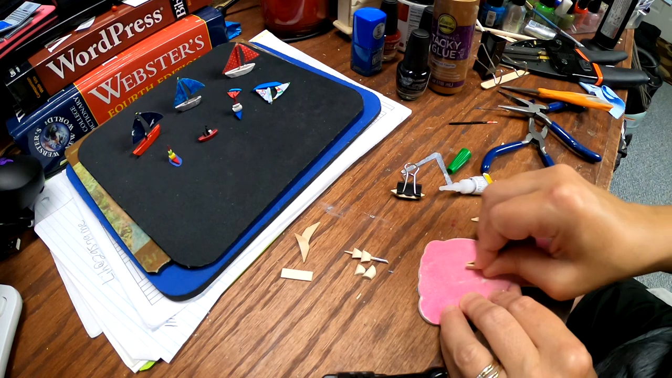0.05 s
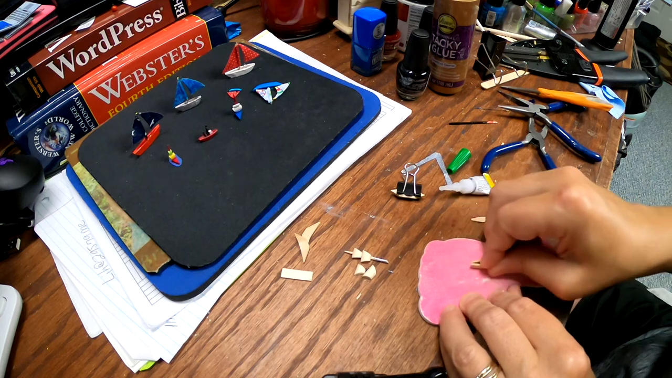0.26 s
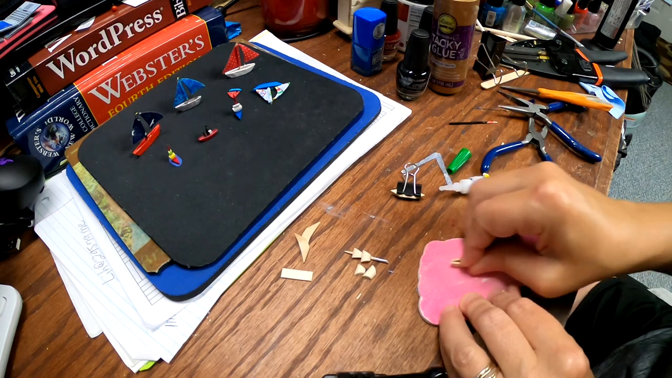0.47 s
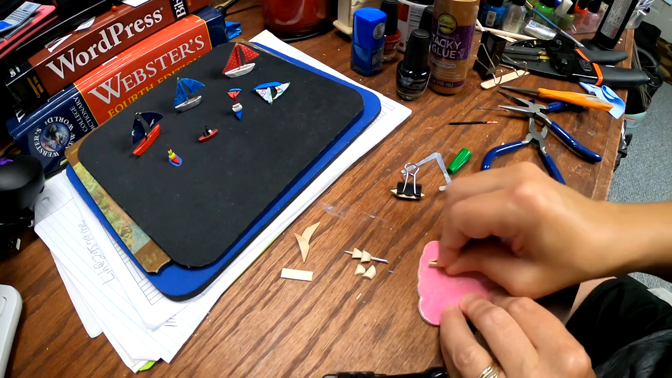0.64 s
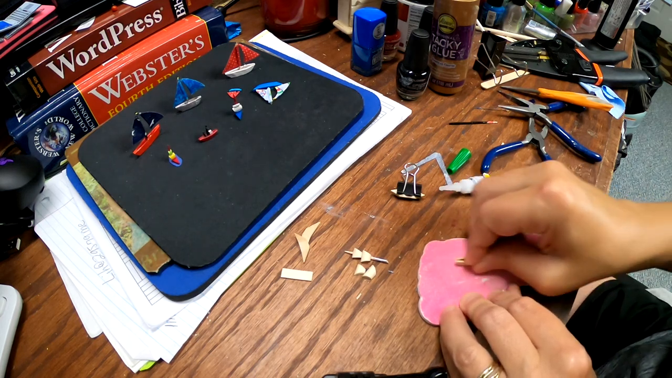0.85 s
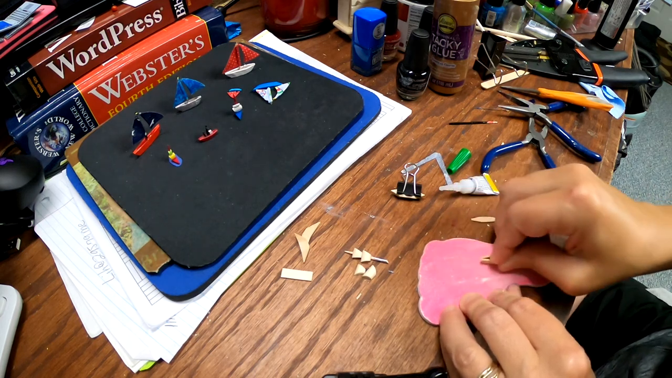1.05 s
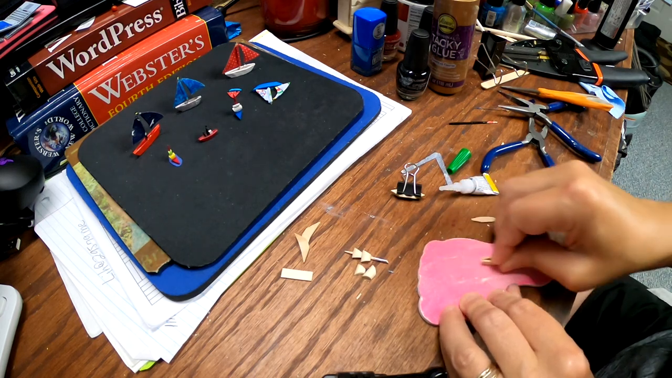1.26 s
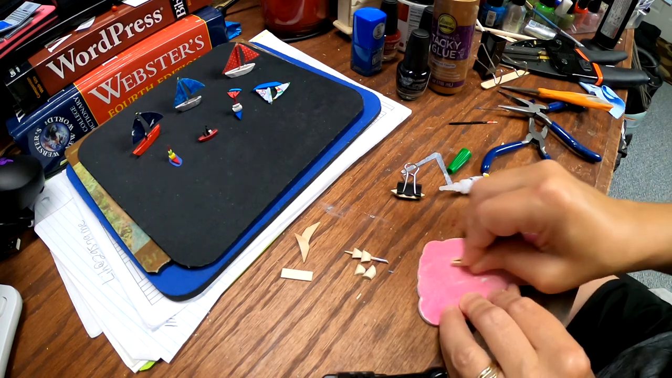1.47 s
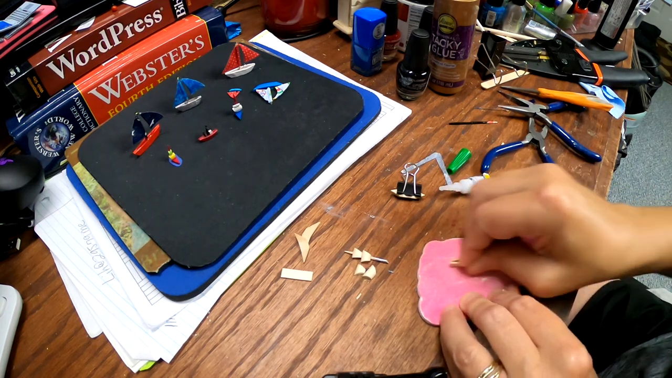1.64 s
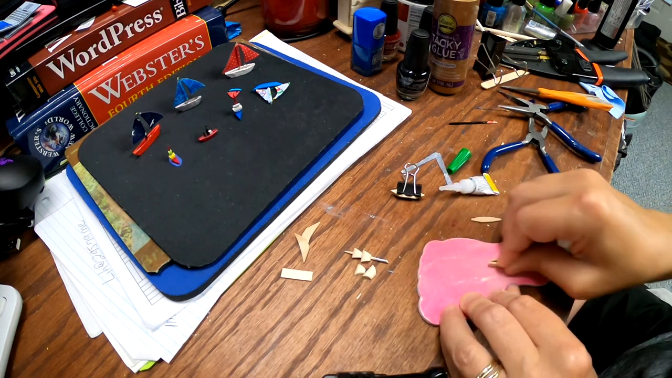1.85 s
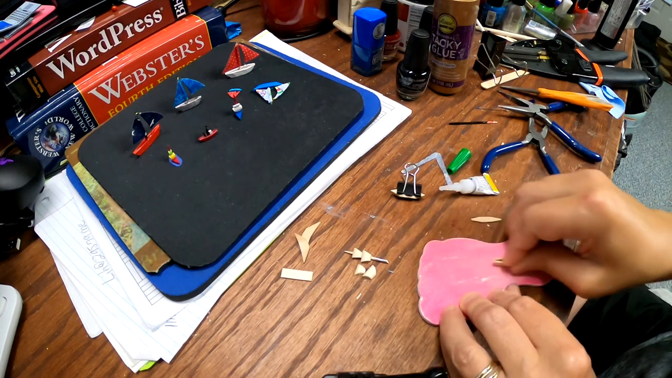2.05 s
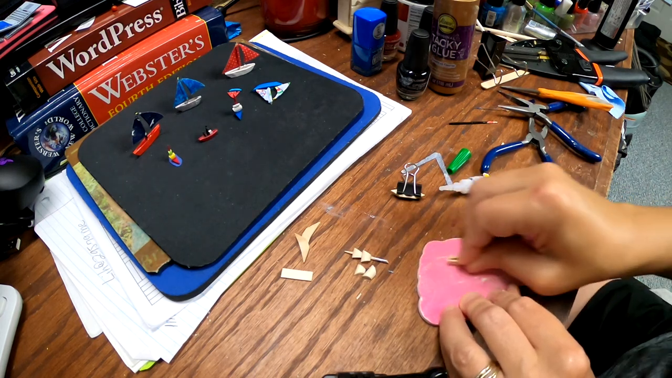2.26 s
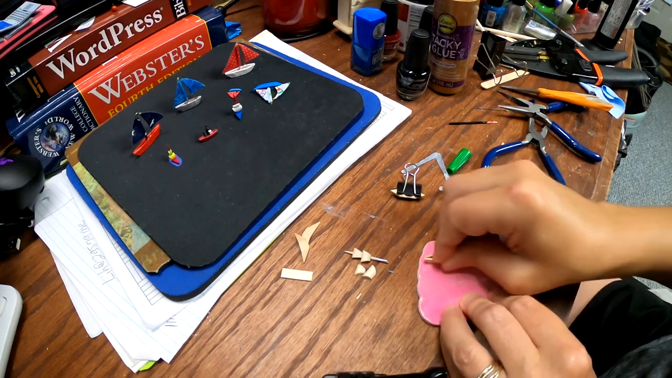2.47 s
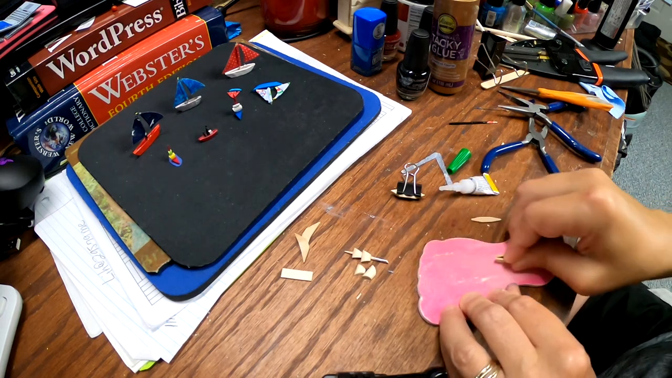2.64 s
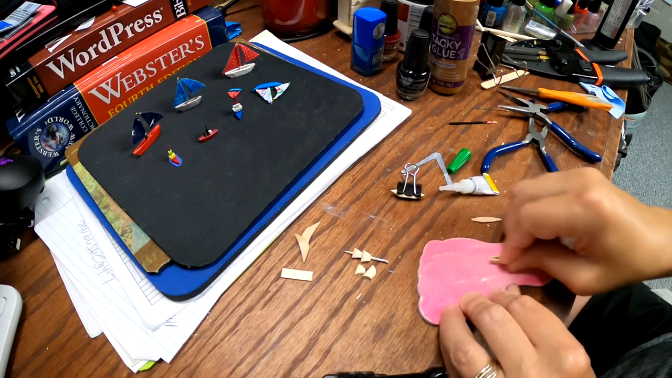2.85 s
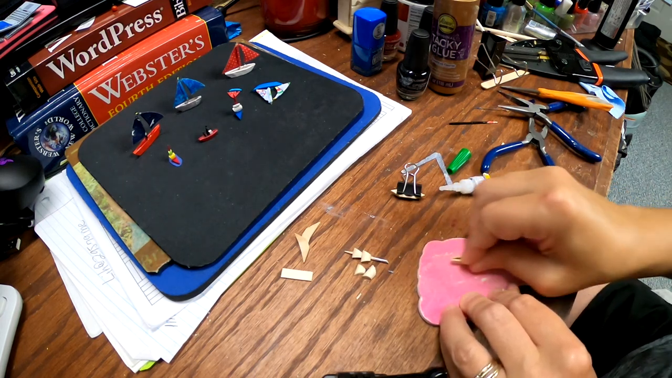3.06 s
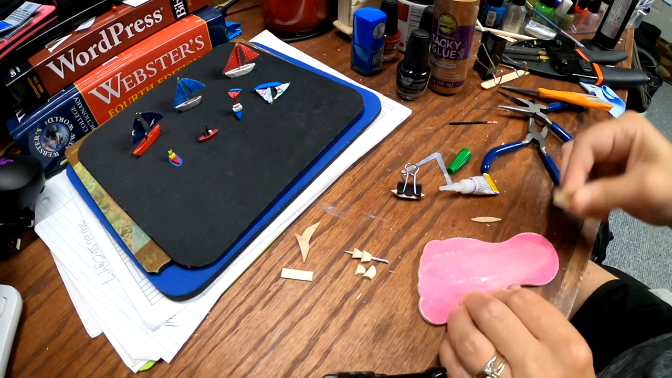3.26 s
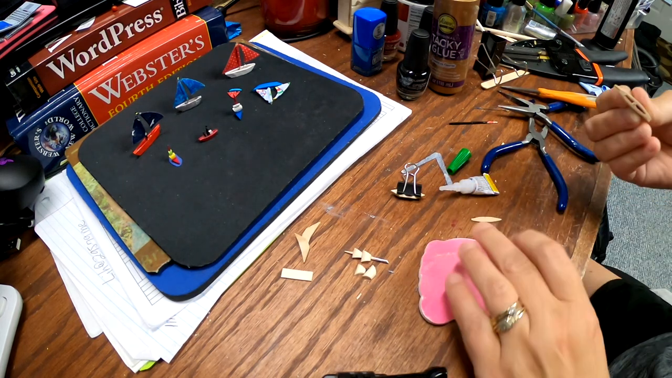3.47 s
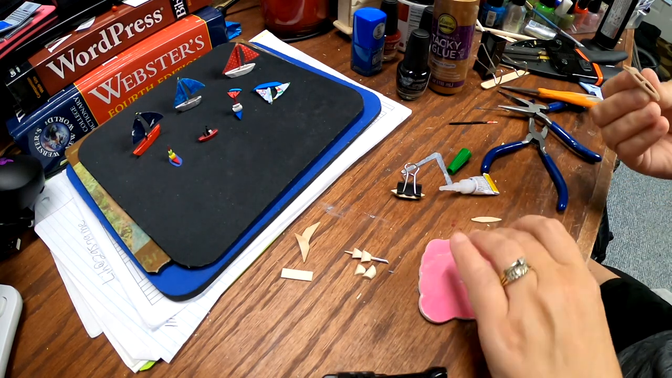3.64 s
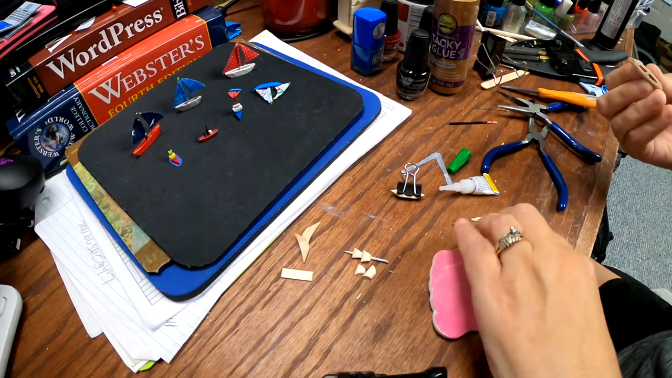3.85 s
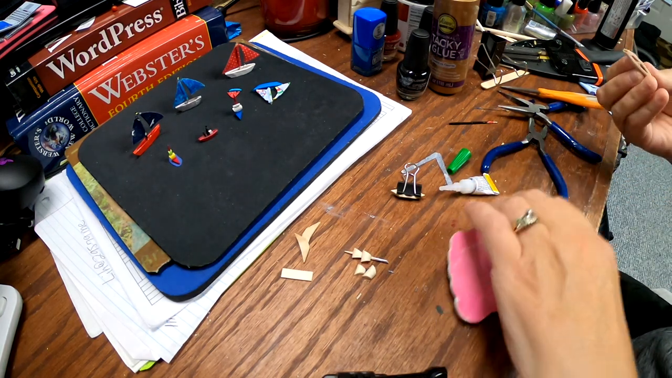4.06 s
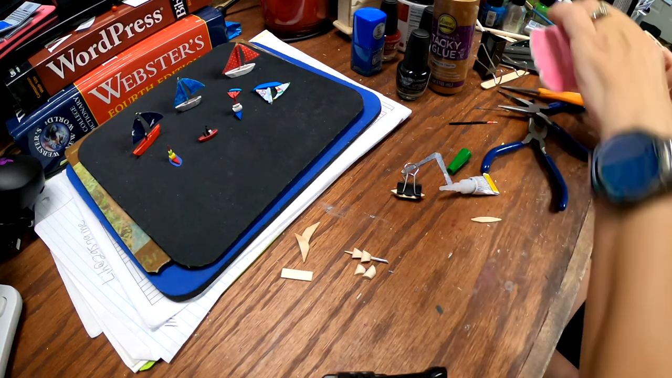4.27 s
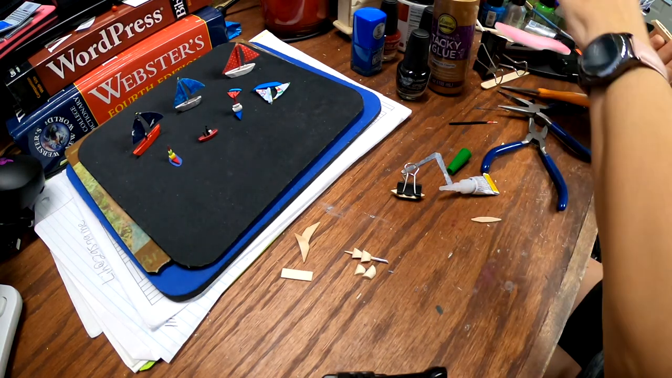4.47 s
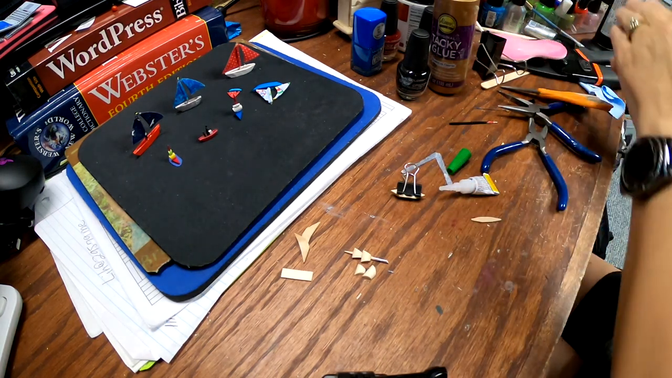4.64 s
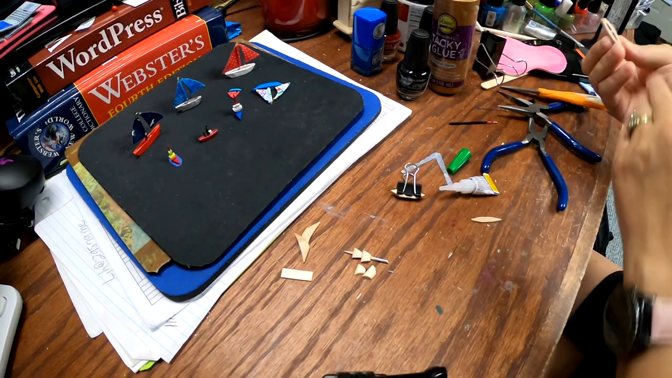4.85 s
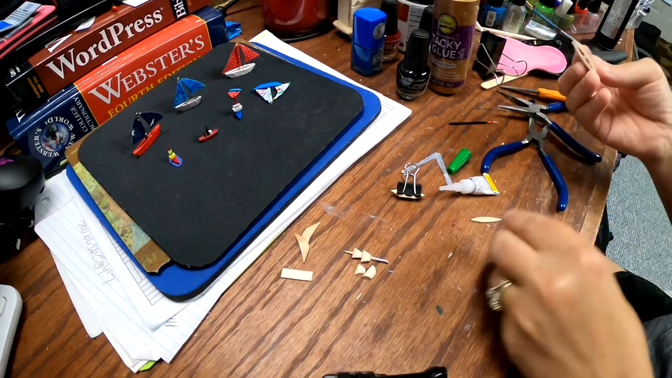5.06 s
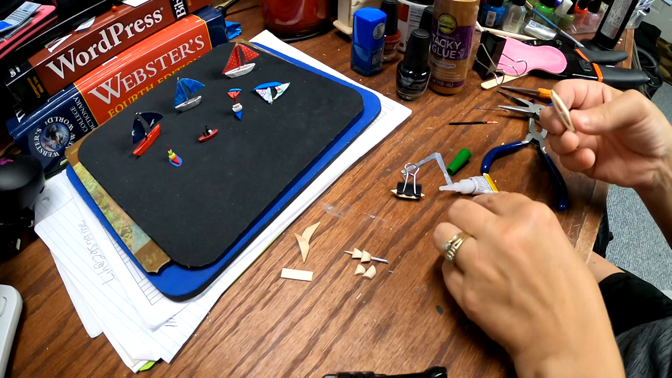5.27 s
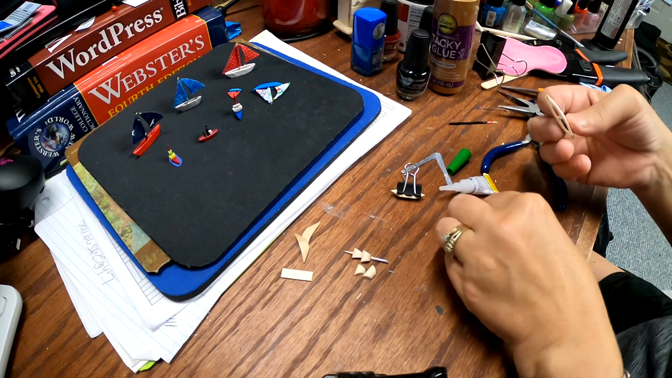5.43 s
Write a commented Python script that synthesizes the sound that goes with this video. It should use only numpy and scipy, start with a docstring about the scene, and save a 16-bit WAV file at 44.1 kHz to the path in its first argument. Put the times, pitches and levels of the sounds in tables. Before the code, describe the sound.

Quick dry rasping strokes over a rumbling desk stop abruptly, hands brush away, a light pad slaps onto clutter, and small taps settle.

```python
"""A sliver of wood is sanded by hand on a thin abrasive pad on a desk, about eight strokes a second.
Noise made of random grain catches gives the rasp and scrape, and each stroke rocks the desk in a low hum.
Then hands slide away in soft noise and the pad is tossed onto clutter: noise bursts and ringing modes.
A few small things knock and settle, two of them faintly before the toss. Close sound in a small room,
over a quiet background; only a faint hiss differs between left and right."""
import sys
import numpy as np
from scipy import signal
from scipy.fft import rfft, irfft, next_fast_len
from scipy.io import wavfile
from scipy.ndimage import uniform_filter1d, map_coordinates

SR = 44100
rng = np.random.default_rng(int(sys.argv[2]) if len(sys.argv) > 2 else 0)


def put_to_file(sound):
    """Save the sound as 16-bit audio at rate SR, in the file named by the first command-line argument."""
    columns = np.atleast_2d(sound).T  # one column per channel
    safe = np.clip(columns, -1, 1)
    whole_steps = np.round(safe * 32767)
    wavfile.write(sys.argv[1], SR, whole_steps.astype(np.int16))


N = 242726
TIME = np.arange(N) / SR   # seconds

# Levels in dB are relative: the functions may add more gain.
# A "tone" table is the shape of a noise spectrum. Each row: frequency in Hz, relative level in dB per Hz.
# A "peaks" table adds resonances to a tone. Each row: centre in Hz, width in Hz, relative level in dB.
# T60 is the time in seconds in which a sound dies away by 60 dB.

# Tone of the quiet background. Each row: frequency in Hz, level in dB per Hz.
AMBIENCE_TONE = [(20, -5), (190, 0), (320, -9), (520, -24), (850, -18), (1900, -32), (5200, -32),
                 (8000, -40), (15500, -55)]
# Tone of the faint hiss. Each row: frequency in Hz, level in dB per Hz.
HISS_TONE = [(200, -9.5), (2500, -17.0), (4500, -9.0), (10000, -15.5), (12800, 5.5), (15500, -10.0)]
AMBIENCE_DB, ROOM_T60_S, CUTOFF_HZ = -58, 0.11, 15750
ECHO_S, ECHO_DB = 0.00241, -15.5   # early reflection off the things standing on the desk

# The hand's rhythm, with strokes spaced evenly between rows; odd strokes go forward.
# Each row: start in seconds, stroke number.
PACE = [(-0.04, 0), (0.225, 2), (1.381, 11), (1.501, 12), (2.157, 17), (2.964, 23), (3.089, 24)]
LAST_STROKE_END_S = 3.308
SETTLING = 0.52   # early pauses are longer by up to about this share, until the hand finds its rhythm
SWELL_SCATTER = 0.21   # strokes reach their top speed earlier or later, by about this share
# How hard the wood is pressed on the grit. Each row: time in seconds, rasp level in dB.
PRESSURE = [(0, -40), (1.55, -38.5), (2.1, -38), (3.05, -39)]
# How hard the arm shoves the desk. Each row: time in seconds, rocking level in dB.
SHOVE = [(-0.04, -76), (0.1, -37.5), (0.23, -42), (0.42, -37), (1.05, -35), (2.1, -34), (2.32, -39),
         (2.8, -39), (3.05, -36.5)]
FORWARD_RASP_DB, FORWARD_SCRAPE_DB = 0.7, 1.5   # forward strokes are this much stronger than back strokes
FORWARD_SHOVE_DB, FORWARD_SHOVE_DB_PER_S = 2, 2.5   # the arm leans more and more into the forward strokes
BACK_JUDDER_DB = 1.5   # back strokes rumble this much more

# Panel rumble of the desk under the strokes. Each row: frequency in Hz, level in dB per Hz.
DESK_TONE = [(20, 1.5), (60, -0.5), (180, -4.5), (290, -18), (450, -23.5), (700, -30)]
# Resonances of the desk panels. Each row: centre in Hz, width in Hz, level in dB.
DESK_PEAKS = [(142.2, 7.9, -0.5), (221.8, 21, 4), (356, 96, -5)]
# Panel rumble under the sliding hands. Each row: frequency in Hz, level in dB per Hz.
RESTING_TONE = [(20, -3), (110, 7), (205, 3), (300, -6), (480, -18)]
DESK_HZ = 58.94   # the desk top's lowest mode
# Hands and pad bear on the desk and set it swaying. Each row: time in seconds, peak level in dB.
NUDGES = [(3.42, -46.5), (3.63, -38), (3.89, -36), (4.04, -46), (4.62, -35.5), (5.41, -42)]
NUDGE_RISE_S, SWAY_FALL_DB_PER_S = 0.079, 90
# Crowded low modes of the desk under a blow. Each row: frequency in Hz, level in dB per Hz.
WOODY_TONE = [(150, -11), (240, 4), (380, -6.5), (520, -16), (760, 0), (1400, -21)]
# Single low modes of the desk under a blow. Each row: frequency in Hz, level in dB, T60 in seconds.
THUD_MODES = [(232, 1, 0.11), (314, -13, 0.07), (378, -10, 0.08)]

# Hands and pad slide over the desk.
# Each row: start in seconds, end in seconds, brushing level in dB, panel rumble level in dB.
SLIDES = [(3.342, 3.738, -70.5, -54), (3.833, 3.918, -64, -50.5), (4.268, 4.628, -64.5, -64.5),
          (4.71, 4.957, -62, -58), (5.438, 5.502, -61.5, -48.5)]
SLIDE_RISE_S, SLIDE_FALL_DB_PER_S = 0.17, 47
# Tone of the brushing. Each row: frequency in Hz, level in dB per Hz.
BRUSH_TONE = [(850, -30), (1300, 11.5), (2600, 14), (4300, 13.5), (5400, 9.5), (6500, -8), (12000, -55)]
# Skin swishes over pad and desk.
# Each row: middle in seconds, length in seconds, level in dB, centre in Hz, width in Hz.
SWISHES = [(3.59, 0.027, -65, 3900, 2600), (3.658, 0.026, -63.5, 4500, 2200),
           (3.87, 0.0056, -57, 2100, 1500), (3.909, 0.047, -61.5, 4070, 1980), (4.12, 0.26, -69, 2290, 350),
           (4.135, 0.12, -62.5, 3700, 1200)]
# Short scuffs of fingers and pad, and one short swell of noise just before the landing.
# Each row: middle in seconds, length in seconds, gritty level, dull level and judder level in dB.
SCUFFS = [(0.005, 0.033, -62, -55, -42), (0.251, 0.032, -60, -71, -41.5), (3.359, 0.026, -49, -66, -66),
          (3.421, 0.05, -65, -60, -48), (3.798, 0.078, -58, -71, -44), (4.495, 0.022, -51, -48.5, -50),
          (4.86, 0.061, -78, -53.5, -49)]
# Tone of the dull part of a scuff. Each row: frequency in Hz, level in dB per Hz.
DULL_TONE = [(450, -19), (800, -4), (1300, -15), (3000, -28)]

# Light taps of small things. Each row: time in seconds, crack level, thud level, hollow level and
# ring level in dB, lower ring in Hz, upper ring in Hz.
TAPS = [(1.8928, -51, -55, -46, -42, 2200, 4200), (3.7646, -54, -64, -60, -41.5, 4250, 4980),
        (4.6439, -30, -48, -43, -32, 1600, 4590), (4.65, -40, -34, -37, -38, 3200, 4300),
        (4.7007, -38.5, -44, -55, -38.5, 2550, 3300), (4.725, -46, -46, -49, -43, 2550, 3070),
        (4.734, -44, -40.5, -49, -41, 2560, 3340), (4.7602, -34.5, -40.5, -29.5, -32, 1410, 3320),
        (4.784, -49, -44, -51, -45, 2560, 3240)]
# The pad lands on the clutter and flops over.
# Each row: time in seconds, slap level in dB, thud level in dB, ring level in dB.
LANDING = [(4.498, -39, -33.5, -35), (4.5038, -48, -41, -31.5), (4.5189, -32.5, -40, -47),
           (4.5307, -37, -28, -40), (4.5334, -43, -32.5, -37.5), (4.5418, -44, -37, -39),
           (4.5472, -44, -45, -35.5)]
# Dry crack of a blow. Each row: frequency in Hz, level in dB per Hz.
CRACK_TONE = [(900, -14), (1900, 4.5), (2800, 7.5), (4000, 3), (4900, -0.5), (5700, -15), (7500, -24),
              (14000, -89)]
# Hollow part of a blow. Each row: frequency in Hz, level in dB per Hz.
HOLLOW_TONE = [(250, 11.5), (500, -3), (1500, -1.5), (2100, -11), (3500, -60)]
# Rattle of the clutter. Each row: frequency in Hz, level in dB per Hz.
RATTLE_TONE = [(2600, -14.5), (3400, -5.5), (5150, 2), (5700, -16), (6600, -31), (12000, -50)]
# Thin metallic ring of the clutter. Each row: centre in Hz, width in Hz, level in dB.
RATTLE_PEAKS = [(7840, 200, -23), (13100, 400, -24.5)]
# What the clutter rings with. Each row: frequency in Hz, level in dB, T60 in seconds.
CLUTTER_MODES = [(735, 6, 0.12), (830, -5, 0.12), (3440, -9, 0.06), (3900, -9, 0.08), (4312, -9, 0.09),
                 (4900, -1, 0.055)]
SOFT_CONTACT_HZ = 6500   # wood and pad are too soft to excite much above this

# Bright rasp of the grit. Each row: frequency in Hz, level in dB per Hz.
RASP_TONE = [(1200, -27), (2400, -11), (3400, -2.5), (5450, 0.5), (5750, -5.5), (6250, -8), (7500, -18),
             (9500, -29), (11200, -32.5), (12600, -28.5), (15500, -35.5)]
# Duller scrape of the pad. Each row: frequency in Hz, level in dB per Hz.
SCRAPE_TONE = [(300, 3), (430, -4), (620, 0.5), (1400, -1), (2100, -3), (3000, -8.5), (5000, -22)]
# Resonances of the pad. Each row: centre in Hz, width in Hz, level in dB.
SCRAPE_PEAKS = [(923, 130, 9.2)]
SCRAPE_DB, SMOOTHING_DB_PER_S = -47, 1.5   # the scrape fades as the edge wears smooth
# Main resonances of the sliver. Each row: centre in Hz, width in Hz.
SLIVER = [(3280, 283), (4190, 290), (5010, 472)]
# Level of the lowest sliver resonance as the grip changes. Each row: time in seconds, level in dB.
LOW_RING = [(0.03, -40), (0.2, -51), (1.4, -64), (1.8, -63), (2.07, -46), (2.35, -49), (3.15, -51.5)]
# Level of the middle sliver resonance. Each row: time in seconds, level in dB.
MIDDLE_RING = [(0, -48), (0.8, -44.5), (1.15, -42.5), (1.3, -37), (1.43, -42.5), (2.45, -45), (3.0, -42),
               (3.17, -41)]
# Level of the highest sliver resonance. Each row: time in seconds, level in dB.
HIGH_RING = [(0, -41.5), (1.55, -44.5), (1.95, -39), (2.2, -39.5), (2.6, -39.5), (3.15, -45.5)]


def from_db(db):
    """Turn decibels into a gain factor."""
    return 10 ** (np.asarray(db) / 20)


def rms_one(x):
    """Scale a sound to an average strength (rms) of 1."""
    return x / np.sqrt(np.mean(x ** 2) + 1e-20)


def noise():
    """White noise, rms 1."""
    return rng.standard_normal(N)


def drift(rate):
    """Slow random wandering with spread 1; a higher rate (Hz) wanders faster."""
    r = np.exp(-80 * np.pi * rate / SR)
    # computed at every 40th sample; the first 2000 values let the filter settle
    slow = signal.lfilter([1], [1, -2 * r, r * r], rng.standard_normal(N // 40 + 2002))[2000:]
    return np.interp(np.arange(N) / 40, np.arange(len(slow)), rms_one(slow))


def curve_at(times, curve):
    """Read a (seconds, dB) curve at the given times."""
    return np.interp(times, *np.transpose(curve))


def colour(x, tone, peaks=()):
    """Filter x to a broad tone with resonances on it, without pre-echo; white noise keeps its power."""
    size = 2 * next_fast_len(N // 2 + SR // 4)
    hz = np.maximum(np.fft.rfftfreq(size, 1 / SR), 1)
    points, db = np.transpose(tone)
    # fade out well beyond both ends of the table
    skirts = 1 / (1 + (hz / points[-1] / 2) ** 8) / (1 + (points[0] / hz / 2) ** 8)
    power = from_db(np.interp(np.log(hz), np.log(points), db)) ** 2 * skirts + 1e-12
    for centre, width, peak_db in peaks:
        power = power + (from_db(peak_db) / (1 + ((hz - centre) / width) ** 2 * 2)) ** 2
    cepstrum = irfft(np.log(power / power.mean()))[:size // 2]   # its causal half gives minimum phase
    cepstrum[0] /= 2
    response = np.exp(rfft(cepstrum, size))
    return irfft(rfft(x, size) * response, size)[:N]


def band(x, hz, width_hz):
    """A broad resonance; rms 1."""
    edges = np.clip([hz - width_hz / 2, hz + width_hz / 2], 20, .45 * SR)
    return rms_one(signal.sosfilt(signal.butter(2, edges, "band", fs=SR, output="sos"), x))


def softened(x):
    """A soft contact takes the sharp edge off a sound."""
    return signal.sosfilt(signal.butter(4, SOFT_CONTACT_HZ, fs=SR, output="sos"), x)


def grit(per_s, spread_db):
    """Grains catch at random; positive spread makes a few much harder, negative a few weaker; rms 1."""
    caught = rng.random(N) < per_s / SR
    hardness = from_db(spread_db * np.minimum(rng.exponential(1, N), 4))
    return rms_one(caught * noise() * hardness)


def strike(times, blow_db, modes, scatter_db):
    """Blows set every mode of a body ringing, each time with slightly different strengths."""
    out = np.zeros(N)
    at = np.round(times * SR).astype(int)
    for hz, mode_db, t60 in modes:
        clicks = np.full(N, 1e-18)
        clicks[at] = from_db(blow_db + mode_db + scatter_db * rng.standard_normal(len(at)))
        r = from_db(-60 / (t60 * SR))   # decay per sample
        w = 2 * np.pi * hz / SR
        out += signal.lfilter([0, np.sin(w)], [1, -2 * r * np.cos(w), r * r], clicks)
    return out


def bursts(times, blow_db, tone, t60, peaks=()):
    """Crowded, quickly damped modes: a sudden noise that dies away after each blow."""
    clicks = np.full(N, 1e-18)
    clicks[np.round(times * SR).astype(int)] = from_db(blow_db)
    decay = signal.lfilter([1], [1, -from_db(-60 / (t60 * SR))], clicks)
    return colour(decay * noise(), tone, peaks)


def stroke_starts():
    """Start of every stroke in seconds, from the hand's rhythm."""
    seconds, number = np.transpose(PACE)
    return np.interp(np.arange(number[-1] + 1), number, seconds)


def per_stroke(curve, forward_db):
    """Strength of every stroke in dB: a slow curve, with forward strokes raised over back strokes."""
    starts = stroke_starts()
    return curve_at(starts, curve) + forward_db * (np.arange(len(starts)) % 2 - .5)


def swing(strengths_db, pause_s, skew, fullness):
    """In every stroke the hand speeds up and stops, and may pause before turning; strength follows speed."""
    out = np.zeros(N)
    starts = stroke_starts()
    pauses = pause_s * (1 + SETTLING * np.exp(-starts))
    ends = np.append(starts[1:], LAST_STROKE_END_S) - pauses
    skews = skew * np.exp(SWELL_SCATTER * rng.standard_normal(len(starts)))
    for start, end, db, lean in zip(starts, ends, strengths_db, skews):
        travel = (TIME - start) / (end - start)
        moving = (travel > 0) & (travel < 1)
        out[moving] += from_db(db) * np.sin(np.pi * travel[moving] ** lean) ** fullness
    # the pressure fades as the last stroke runs out
    return out * from_db(np.interp(TIME, [3.16, LAST_STROKE_END_S], [0, -9]))


def gestures(starts, ends, levels_db, rise_s, fall_db_per_s):
    """Gain of hand movements: each swells up to its start, holds to its end and dies away."""
    rise = np.clip((TIME - starts[:, None]) / rise_s + 1, 0, 1) ** 2
    fall_db = fall_db_per_s * np.maximum(TIME - ends[:, None], 0)
    return np.max(rise * from_db(levels_db[:, None] - fall_db), axis=0)


def sliding():
    """Gains of the brushing and of the panel rumble while the hands slide."""
    starts, ends, *levels = np.transpose(SLIDES)
    return [gestures(starts, ends, db, SLIDE_RISE_S, SLIDE_FALL_DB_PER_S) for db in levels]


def ambience():
    """The quiet background is steady noise, strongest in the bass."""
    return from_db(AMBIENCE_DB) * colour(noise(), AMBIENCE_TONE)


def room(x, wet_db):
    """A small furnished room adds a short diffuse tail."""
    t = TIME[:SR // 2]
    tail = rng.standard_normal(len(t)) * from_db(-60 * t / ROOM_T60_S) * (t > .005)
    tail /= np.sqrt(np.sum(tail ** 2))
    return x + from_db(wet_db) * signal.fftconvolve(x, tail)[:N]


def reflected(x):
    """One early reflection, a delayed quieter copy, ripples the spectrum."""
    return x + from_db(ECHO_DB) * np.interp(TIME - ECHO_S, TIME, x, left=0)


def hiss(hiss_db=-35):
    """A faint hiss, strongest at the very top, swells with the strokes over a steady floor."""
    strokes = swing(per_stroke(PRESSURE, FORWARD_RASP_DB) + hiss_db, pause_s=.01, skew=1, fullness=.5)
    return (strokes + from_db(-88.0)) * colour(noise(), HISS_TONE)


def desk(rocking_db=6.0, rumble_db=-43.0, lag_s=0.0188, wander_hz=2.57, lumpy_db=3.0):
    """Strokes, and later the hands, swing the desk top in its lowest mode and rumble its panels."""
    shove_db = per_stroke(SHOVE, FORWARD_SHOVE_DB + FORWARD_SHOVE_DB_PER_S * stroke_starts())
    times, nudge_db = np.transpose(NUDGES)
    nudged = gestures(times, times, nudge_db, NUDGE_RISE_S, SWAY_FALL_DB_PER_S)
    _, rumble = sliding()
    # the heavy top answers a little later than the hand pushes
    push = swing(shove_db + rocking_db, pause_s=0, skew=0.27, fullness=0.38)
    late_push = np.interp(TIME - lag_s, TIME, push)
    swaying = uniform_filter1d(late_push + nudged, size=SR // 80)
    hz = DESK_HZ + wander_hz * drift(7.07)
    boom = np.sqrt(2) * swaying * np.sin(2 * np.pi * np.cumsum(hz) / SR)
    lumps = noise() * from_db(lumpy_db * drift(22.0))
    shaking = swing(per_stroke([(0, rumble_db)], -BACK_JUDDER_DB), pause_s=0, skew=0.4, fullness=0.34)
    return boom + colour(lumps * shaking, DESK_TONE, DESK_PEAKS) + colour(lumps * rumble, RESTING_TONE)


def thuds(times, blow_db, woody_db=-4.5, modes_db=-1.5):
    """The desk answers a blow with a woody bump and a brief ring of its low modes."""
    bump = bursts(times, blow_db + woody_db, WOODY_TONE, t60=0.074)
    return bump + strike(times, blow_db + modes_db, THUD_MODES, scatter_db=5.5)


def brushing(brush_db=0.0, uneven_db=-1.5):
    """Hands, arm and pad slide softly once the sanding has stopped: dense, gently uneven noise."""
    brush, _ = sliding()
    texture = colour(grit(per_s=9700, spread_db=-2.5), BRUSH_TONE)
    return brush * from_db(brush_db + uneven_db * drift(40)) * texture


def swishes(uneven_db=1.5):
    """Skin brushes past pad and desk in short soft swells of noise, each with its own colour."""
    swells = np.zeros(N)
    for middle, length, db, hz, width in SWISHES:
        swell = np.exp(-(2 * (TIME - middle) / length) ** 2)
        swells += from_db(db) * swell * band(noise(), hz, width)
    return swells * from_db(uneven_db * drift(40))


def scuffs():
    """Short swells of gritty, dull and juddering noise: fingers and pad scuff, and one leads into the landing."""
    middle, length, *levels = np.transpose(SCUFFS)
    swells = np.exp(-(2 * (TIME - middle[:, None]) / length[:, None]) ** 2)
    gritty, dull, judder = from_db(levels) @ swells
    rasp = colour(gritty * grit(per_s=1800, spread_db=0.5), RASP_TONE)
    juddering = colour(judder * noise(), DULL_TONE, [(205, 88, 19.0)])
    return softened(rasp) + colour(dull * noise(), DULL_TONE) + juddering


def taps(ring_t60=0.017):
    """Small things touch the desk: a dry crack, a hollow knock, a little thud and two short rings."""
    times, crack, thud, hollow, *_ = np.transpose(TAPS)
    knock = bursts(times, crack, CRACK_TONE, t60=0.027) + bursts(times, hollow, HOLLOW_TONE, t60=0.035)
    rings = np.zeros(N)
    for time, *_, ring_db, low_hz, high_hz in TAPS:
        modes = [(low_hz, 0, ring_t60), (high_hz, 0, ring_t60)]
        rings += strike(np.array([time]), ring_db, modes, scatter_db=1)
    return knock + softened(rings) + thuds(times, thud)


def landing(rattle_db=0.5, ring_db=-8.5):
    """The pad slaps onto the clutter in several quick touches; clutter and desk rattle and ring."""
    times, slap, thud, ring = np.transpose(LANDING)
    touch = bursts(times, slap, CRACK_TONE, t60=0.025) + bursts(times, slap, HOLLOW_TONE, t60=0.045)
    rattle = bursts(times, ring + rattle_db, RATTLE_TONE, t60=0.043, peaks=RATTLE_PEAKS)
    ringing = softened(strike(times, ring + ring_db, CLUTTER_MODES, scatter_db=2.0))
    return touch + rattle + ringing + thuds(times, thud)


def turning(creep_db=-63):
    """Even while the hand turns, pressed wood creeps and crackles faintly, until the last stroke starts."""
    crackle = grit(per_s=900, spread_db=5.5)
    peaks = [(hz, width, 2) for hz, width in SLIVER]
    return (TIME < stroke_starts()[-1]) * from_db(creep_db) * colour(crackle, SCRAPE_TONE, peaks)


def gripped(x, shift):
    """The changing grip of the fingers pulls the wood's resonances up and down a little (uneven reading)."""
    return map_coordinates(x, [np.cumsum(1 + shift * drift(3.71))], order=5, mode="mirror")


def sanding(uneven_db=1.0, scrape_uneven_db=2.5, ring_waver_db=1.36):
    """Grit tears at the wood: a bright rasp rings the sliver, and the pad under it scrapes more dully."""
    starts = stroke_starts()
    unevenness = drift(42)

    rasp = from_db(curve_at(TIME, PRESSURE)) * colour(grit(per_s=14000, spread_db=1.0), RASP_TONE)
    for (hz, width_hz), levels in zip(SLIVER, (LOW_RING, MIDDLE_RING, HIGH_RING)):
        level_db = curve_at(TIME, levels) + ring_waver_db * drift(16)
        ring = band(grit(per_s=5000, spread_db=1.5), hz, width_hz)
        rasp += from_db(level_db) * gripped(ring, shift=0.006)
    rasp *= swing(per_stroke([(0, 0)], FORWARD_RASP_DB), pause_s=0.021, skew=0.93, fullness=0.9)
    rasp *= from_db(uneven_db * unevenness)

    # the pad resonates only on the forward strokes
    forward = np.searchsorted(starts, TIME) % 2 == 0   # an even count of starts so far: an odd stroke
    drag = grit(per_s=6000, spread_db=0.5)
    scrape = np.where(forward, colour(drag, SCRAPE_TONE, SCRAPE_PEAKS), colour(drag, SCRAPE_TONE))
    scrape_levels = per_stroke([(0, SCRAPE_DB)], FORWARD_SCRAPE_DB) - SMOOTHING_DB_PER_S * starts
    scrape *= swing(scrape_levels, pause_s=0.021, skew=1.3, fullness=0.31)
    scrape *= from_db(scrape_uneven_db * unevenness)
    return rasp + scrape


def scene():
    """Add up all sources; the hiss has opposite sign left and right."""
    hand_work = room(sanding() + turning() + scuffs(), wet_db=-13)
    blows = room(landing() + taps(), wet_db=-12.0)
    on_desk = reflected(hand_work + blows + brushing() + swishes())
    return on_desk + desk() + ambience() + hiss() * np.array([[1], [-1]])


def record(dry):
    """The top is cut steeply."""
    return signal.sosfilt(signal.ellip(10, .1, 80, CUTOFF_HZ, fs=SR, output="sos"), dry)


dry = scene()
out = record(dry)
put_to_file(out)
```